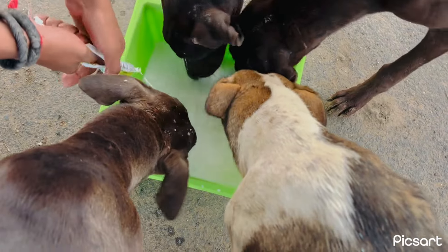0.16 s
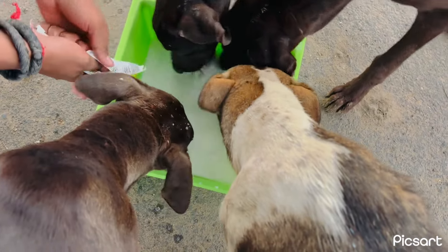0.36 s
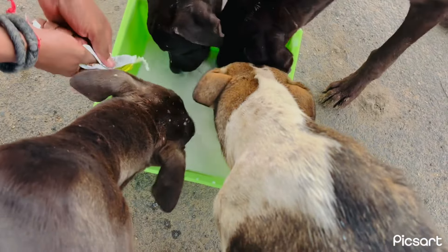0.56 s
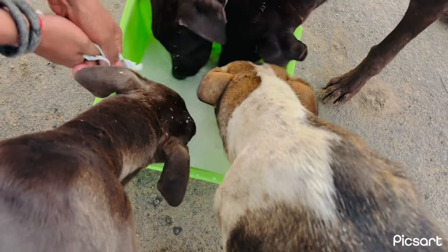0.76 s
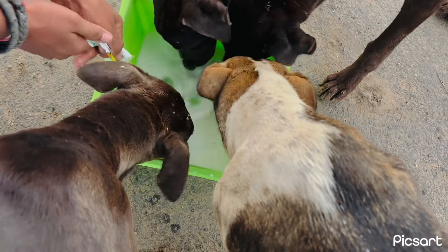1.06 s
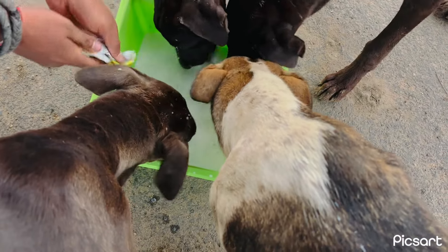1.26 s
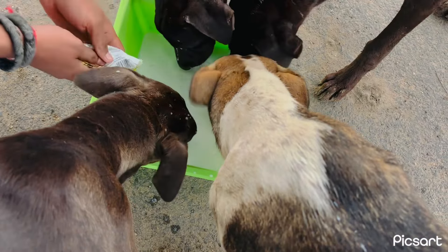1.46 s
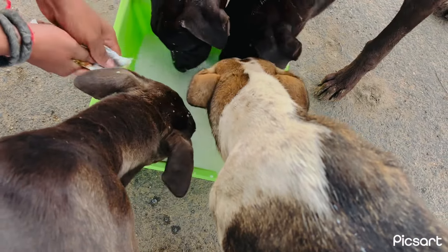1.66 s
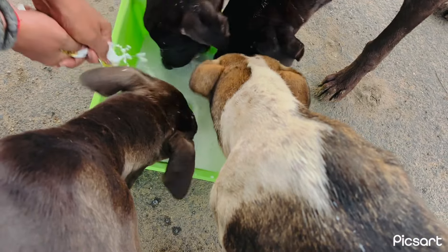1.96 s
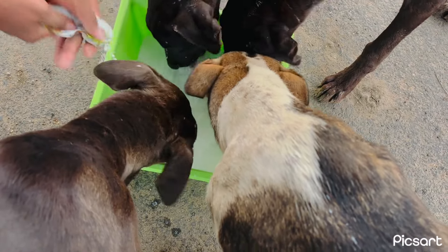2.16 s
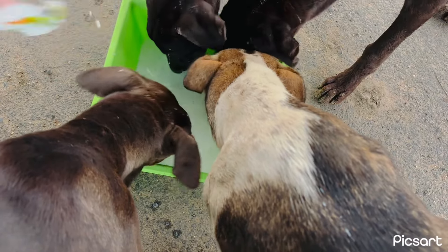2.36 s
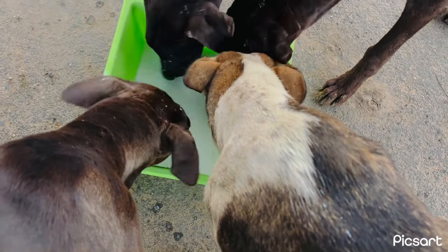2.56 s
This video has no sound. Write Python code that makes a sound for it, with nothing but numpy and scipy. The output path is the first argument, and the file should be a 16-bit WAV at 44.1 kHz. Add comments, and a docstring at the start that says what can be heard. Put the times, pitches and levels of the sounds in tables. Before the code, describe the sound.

Several dogs lapping liquid from a plastic tub outdoors, close and wet, with wind buffeting the microphone

```python
"""Wet laps, plops and smacks: several dogs drink from a plastic tub on open ground, close below the microphone.
Tongues slap the surface (bubble clusters), pop air pockets (short resonances) and snap wet films (noise bursts).
Froth ticks and fine spatter surround them, over bubbling, washing liquid; the tub's walls answer briefly.
Gusts of wind buffet the microphone with a noise rumble, a flutter of dull pulses and single thumps.
Behind lie a faint echo of the yard and the outdoor air, both shaped noise."""
import sys
import numpy as np
from scipy import signal
from scipy.fft import rfft, irfft, next_fast_len
from scipy.io import wavfile
from scipy.ndimage import uniform_filter1d, map_coordinates

SR = 44100
rng = np.random.default_rng(int(sys.argv[2]) if len(sys.argv) > 2 else 0)


def materialize(psi):
    """Save the field psi as 16-bit PCM at rate SR to the path in sys.argv[1].

    A 1-D psi becomes a single channel; in a 2-D psi each row is a channel.
    """
    bounded = np.clip(np.atleast_2d(psi).T, -1, 1)
    quanta = np.round(bounded * 32767).astype(np.int16)
    wavfile.write(sys.argv[1], SR, quanta)


N = 119070

# Levels are starting levels, before the trims, echoes, filters and port differences that follow.
# Colours give relative level over frequency.

# Air pockets popped by the tongues [t/s, f/Hz, level/dB, swell/ms]
PLOPS = [(0.085, 1240, -26.5, 1.7), (0.3244, 2110, -26, 1.4), (0.3329, 1253, -22, 1.6),
         (0.3792, 1380, -33, 0.91), (0.3935, 1170, -31, 1.5), (0.4197, 1430, -30, 0.85),
         (0.4386, 1280, -23, 0.79), (0.477, 1240, -29, 1.8), (0.616, 1290, -31, 1.5),
         (0.6272, 1570, -26, 1), (0.697, 1750, -34.5, 1.6), (.7280, 1230, -29, 0.62),
         (0.733, 2040, -37, 1.1), (0.759, 1100, -27.5, 1.5), (0.7795, 1220, -36.5, 1.2),
         (0.931, 1300, -30.5, 0.43), (0.9512, 2010, -32, 0.71), (0.9595, 1340, -35.5, 1.1),
         (1.0557, 1374, -34.5, 3.6), (1.073, 1300, -27, 1), (1.171, 1690, -40, 2.2),
         (1.1795, 1870, -39, 2.6), (1.2533, 1750, -32, 1), (1.264, 1730, -25.5, 0.59),
         (1.3108, 1240, -25, 0.41), (1.378, 1240, -24, 0.82), (1.383, 1520, -24, 0.73),
         (1.473, 1270, -25, 0.44), (1.557, 1440, -30.5, 0.45), (1.596, 1360, -27, 0.88),
         (1.685, 1220, -31.5, 0.49), (1.684, 2140, -37, 1.1), (1.7195, 1420, -29, 2.1),
         (1.718, 1820, -32.5, 1.8), (1.8087, 1270, -34.5, 0.92), (1.8105, 2160, -34, 1),
         (1.8961, 1295, -34.5, 1.35), (1.8976, 2460, -35, 0.7), (2.0297, 1360, -25.5, 0.42),
         (2.0392, 1130, -35, 0.72), (2.1515, 1440, -30.5, 0.79), (2.198, 1400, -36, 1.3),
         (2.231, 1340, -41.5, 1.5), (2.261, 2270, -37.5, 1.4), (2.298, 770, -33.5, 0.74),
         (2.2851, 2020, -31.5, 0.22), (2.3236, 1500, -29.5, 0.66), (2.341, 2370, -33.5, 0.72),
         (2.3969, 1410, -30, 1.5), (2.41, 1350, -32, 1.5), (2.4163, 1440, -22.5, 1.6),
         (2.461, 1250, -36.5, 1), (2.486, 785, -34.5, 1.1), (2.5858, 1940, -35.5, 1.9),
         (2.5872, 1174, -31.5, 1.2)]
PLOP_RISE = 0.0078  # relative pitch rise per swell time, for all bubbles but the fine grains
PLOP_SNAP_DB = -11.5
PLOP_OVERTONE_DB, PLOP_OVERTONE_RATIO = -16.5, 1.7  # second resonance
PLOP_SPLASH_DB, PLOP_SPLASH_S = -10, 0.0082
# Small bubbles that burst after each plop
DROPLET_DB, DROPLET_SPREAD_S, DROPLET_HZ, DROPLET_SWELL_CYCLES = -19, 0.013, 2510, 1.36

# Tongues slapping the surface [t/s, centre f/Hz, level/dB, life/ms]
SLAPS = [(0.216, 3370, -38, 4), (.3245, 2590, -23.5, 2.44), (0.334, 2300, -29.5, 5.9),
         (0.62, 1880, -37, 8.9), (.727, 2740, -34, 10), (0.95, 2620, -46, 5.7), (1.043, 2560, -36, 7),
         (1.180, 1930, -29, 6), (1.4722, 2960, -24, 1.5), (1.597, 2180, -33, 5.4),
         (1.92, 1450, -37.5, 10.3), (2.156, 2440, -38.5, 4.3), (2.3958, 2700, -28.5, 2.5),
         (2.414, 2060, -32, 5)]
SLAP_DB, SLAP_PITCH_SPREAD, SLAP_SWELL_CYCLES = -2.5, 0.19, 1.94  # spread is of log pitch

# Wet films snapping on lips and tongues [t/s, f/Hz, level/dB, swell/ms]
SMACKS = [(0.064, 5050, -32.5, 0.61), (.0850, 3370, -40.5, 0.81), (0.121, 5160, -45, 0.67),
          (0.3847, 9850, -40.5, 1.2), (.4385, 3360, -38.5, 0.65), (0.464, 9000, -43, 1.44),
          (0.4686, 4900, -43, 1.6), (.5023, 4840, -35.5, 0.27), (0.6243, 3850, -42, 2.2),
          (.7594, 2990, -38.5, 1.3), (.9397, 5000, -34, 0.34), (0.9545, 3700, -39, 0.59),
          (0.978, 4100, -47, 2.2), (1.1713, 4610, -43.5, 1.9), (1.2386, 8340, -40.5, 1.5),
          (1.239, 5030, -39, 0.65), (1.2523, 4950, -37, 0.93), (1.383, 5800, -40, 0.87),
          (1.4058, 4900, -35.5, 0.48), (1.4204, 3540, -34, 0.68), (1.4729, 4300, -24, 0.17),
          (1.557, 4670, -41, 0.81), (1.598, 3950, -44.5, 1.9), (1.6462, 3960, -38, 0.53),
          (1.7130, 5100, -27, 0.13), (1.9118, 6040, -30, 0.14), (2.0327, 5050, -31.5, 1.05),
          (2.2118, 10500, -32.5, 0.3), (2.2857, 5330, -33.5, 0.21), (2.339, 4065, -36, 2),
          (2.3965, 3470, -41, 0.56), (2.5833, 4030, -36, 1.5), (2.6718, 3440, -37.5, 0.54)]
SMACK_SNAP_DB, SMACK_RISE = -4, 0.01  # rise is relative, per swell time

# Needle-sharp clicks of bursting froth [t/s, level/dB]
TICKS = [(0.3017, -33.5), (0.385, -33), (0.4678, -27), (0.5026, -27), (0.554, -33.5), (0.677, -42),
         (0.741, -26), (0.9768, -31), (1.239, -31), (1.302, -31), (1.366, -26.5), (1.4646, -32),
         (1.5532, -34), (1.599, -29), (1.7105, -27), (1.811, -41), (1.911, -33), (1.97, -35),
         (2.0333, -26.5), (2.152, -32.5), (2.2126, -34), (2.398, -31)]
TICK_DB, TICK_LIFE_S = 3.5, 0.0002

# Course of the fine spatter [t/s, level/dB]
SPATTER_COURSE = [(0.0, -42.5), (0.03, -53.5), (0.06, -45.5), (0.14, -44), (0.17, -55.5), (0.23, -49.5),
                  (0.31, -53.5), (0.33, -50), (0.35, -49.5), (0.48, -47.5), (0.59, -51.5), (0.62, -45),
                  (0.65, -46.5), (0.74, -45.5), (0.89, -50.5), (0.95, -41), (1.15, -58), (1.17, -45.5),
                  (1.22, -50), (1.24, -40.5), (1.36, -50), (1.42, -46), (1.44, -76), (1.47, -53),
                  (1.49, -48), (1.54, -59), (1.6, -38.5), (1.62, -51), (1.71, -43.5), (1.71, -45),
                  (1.74, -55.5), (1.97, -45.5), (2.02, -51), (2.04, -66), (2.05, -52.5), (2.41, -50),
                  (2.53, -52), (2.59, -43), (2.61, -58.5), (2.7, -47)]
# Colour of the fine spatter [f/Hz, level/dB]
SPATTER_COLOUR = [(900, -30), (2000, -10), (3200, 6), (5000, 3), (6500, 4.5), (9000, 4), (12000, -1),
                  (15500, -6)]
DROPS_DB, FROTH_DB, FIZZ_DB = -7, -7, -14.5

# Course of the stirred liquid [t/s, level/dB]
SLOSH_COURSE = [(0.0, -44.5), (0.24, -56), (0.41, -53), (0.56, -55.5), (0.71, -46), (0.88, -58),
                (0.99, -43.5), (1.11, -60.5), (1.16, -46), (1.51, -56), (1.85, -52.5), (1.99, -53.5),
                (2.23, -56), (2.37, -54), (2.59, -48.5), (2.63, -58), (2.7, -51)]
# Colour of the liquid's wash [f/Hz, level/dB]
WASH_COLOUR = [(400, -10), (800, -1), (1300, 5.5), (2000, 1), (3000, -10.5), (5000, -16.5)]
BUBBLES_DB, WASH_DB = 0.5, -3

# Course of the deep wind rumble on the microphone [t/s, level/dB]
RUMBLE_COURSE = [(0.0, -32), (0.11, -42.5), (0.17, -32), (0.38, -25), (0.43, -33.5), (0.54, -18.5),
                 (0.69, -28), (0.89, -21.5), (0.93, -28.5), (1.12, -17), (1.22, -29.5), (1.32, -17),
                 (1.46, -24.5), (1.48, -19), (1.72, -27.5), (1.74, -18.5), (2.23, -30), (2.26, -22.5),
                 (2.32, -37.5), (2.35, -25.5), (2.53, -38), (2.7, -32.5)]
# Colour of the rumble [f/Hz, level/dB]
RUMBLE_COLOUR = [(20, -31), (28, -30), (38, -10.5), (50, -5.5), (75, -1.5), (110, -6.5), (170, -10.5),
                 (260, -16.5), (500, -37), (1000, -96)]
# Course of the wind flutter above the rumble [t/s, level/dB]
FLUTTER_COURSE = [(0.0, -46), (0.15, -55.5), (0.19, -35.5), (0.33, -36.5), (0.34, -28), (0.42, -37.5),
                  (0.555, -23.5), (0.6, -37.5), (0.65, -25.5), (0.72, -42.5), (0.77, -26), (1.0, -33),
                  (1.01, -24.5), (1.11, -20.5), (1.22, -46.5), (1.25, -26.5), (1.73, -26), (1.74, -19),
                  (1.81, -28), (1.83, -21), (1.92, -43), (1.94, -24), (2.15, -41), (2.185, -24),
                  (2.21, -43), (2.43, -37.5), (2.47, -45.5), (2.62, -50), (2.65, -39), (2.7, -55)]
# Colour of the flutter [f/Hz, level/dB]
FLUTTER_COLOUR = [(80, -60), (170, -4), (260, 0.5), (400, -1.5), (550, -7.5), (750, -15), (1000, -25.5),
                  (1600, -58), (3000, -87)]
FLUTTER_DB = -0.5
# Dull thumps of the strongest eddies on the microphone [t/s, f/Hz, level/dB, Gaussian width/ms]
EDDIES = [(.348, 326, -14.5, 2), (.486, 195, -15, 3), (.535, 171, -7.5, 2.6), (.551, 346, -10.5, 1.97),
          (.779, 422, -14.5, 1.6), (.822, 460, -24, 1.1), (.853, 560, -20.5, 1.3), (.862, 430, -18, 2.4),
          (.884, 69, -13.5, 11.4), (0.937, 436, -18, 1.3), (1.023, 345, -11.5, 1.3),
          (1.04, 403, -13.5, 0.65), (1.056, 564, -17, 0.34), (1.087, 415, -13, 2.6),
          (1.101, 540, -11.5, 1.4), (1.111, 222, -11, 1.55), (1.128, 380, -11.5, 0.7), (1.143, 500, -22, 3),
          (1.158, 490, -18.5, 0.65), (1.28, 315, -16, 1.8), (1.306, 500, -14, 0.6), (1.327, 99, -8, 6.1),
          (1.333, 450, -16, 0.74), (1.37, 400, -15, 0.71), (1.394, 450, -17.5, 1.5), (1.407, 257, -14, 1.6),
          (1.487, 111, -11, 7.1), (1.506, 380, -17.5, 1.8), (1.553, 460, -10, 1.5),
          (1.574, 634, -16.5, 0.74), (1.583, 410, -16, 1.2), (1.634, 320, -15, 2), (1.737, 500, -15, 1.3),
          (1.749, 403, -13, 0.71), (1.776, 416, -13, 1.04), (1.829, 427, -10.5, 1.66),
          (1.896, 406, -15, 0.66), (1.958, 335, -18.5, 1.2), (1.971, 318, -17, 2.1),
          (2.174, 300, -16, 0.79), (2.183, 280, -24, 1.3), (2.189, 518, -14.5, 1.16),
          (2.369, 466, -23.5, 1.6)]
EDDY_DB = -0.5
# Wind at the two microphone ports [f/Hz, left minus right level/dB]
WIND_BALANCE = [(200, 0.5), (380, 0), (600, 3), (1000, 5.5)]
WIND_LOW_CUT_HZ = 30  # half gain here

# Colour of the background noise, with a deep gap near 12 kHz [f/Hz, level/dB]
AIR_COLOUR = [(100, 5), (300, -13), (640, -18.5), (1340, -22.5), (3000, -33), (6600, -28), (9500, -31),
              (12000, -63), (15500, -55)]
AIR_DB = -47.5

# Echo decay times and levels of the tub's walls and of the yard
TUB_T60_S, TUB_DB, YARD_T60_S, YARD_DB = 0.025, -2, 0.23, -15.5

# Phase at the two microphone ports [f/Hz, left lead/rad]
PORT_PHASE = [(100, 0), (950, -.5), (2900, .8), (3700, .1), (5500, -.2), (6900, -3.1), (7750, -5.8),
              (9700, -6.5), (11200, -8.8), (13000, -9.9), (14200, -12.4), (16000, -12.6)]
# Balance of the two microphone ports [f/Hz, left minus right level/dB]
PORT_BALANCE = [(200, -5), (700, 16.5), (1290, 7), (2380, 4.5), (4400, 2), (8120, 0.8), (15000, -1)]
TOP_HZ = 16300  # recorder's band limit


def plops():
    """Each popped pocket gives a snap, two short resonances, a little splash and a cluster of droplets."""
    track, t = np.zeros((2, N)), np.arange(1400) / SR
    for s, hz, db, swell_ms in PLOPS:
        swell_s = swell_ms / 1000
        ring = pocket(t, hz, swell_s, PLOP_RISE)
        upper_hz = hz * PLOP_OVERTONE_RATIO * np.exp(rng.normal(0, 0.174))
        upper = amp(PLOP_OVERTONE_DB) * pocket(t, upper_hz, 0.56 * swell_s, PLOP_RISE)
        crack = amp(PLOP_SNAP_DB) * snap(t, life_s=0.00033, lo_hz=1200, hi_hz=7650)
        splash = amp(PLOP_SPLASH_DB) * snap(t, life_s=PLOP_SPLASH_S, lo_hz=0.65 * hz, hi_hz=1.29 * hz)
        add(track, s, amp(db) * in_tub(ring + upper + crack + splash))
        add(track, s, amp(db + DROPLET_DB) * in_tub(droplets(t, count=5)))
    return track


def droplets(t, count):
    """Small bubbles of random pitch and size burst at random short delays."""
    r = rng.standard_normal((count, 3))
    hz = DROPLET_HZ * np.exp(0.49 * r[:, :1])
    delay = DROPLET_SPREAD_S * np.abs(r[:, 1:2])
    age = np.maximum(t - delay, 0)
    size = amp(3.1 * np.minimum(r[:, 2:], 1))
    return (size * pocket(age, hz, DROPLET_SWELL_CYCLES / hz, PLOP_RISE)).sum(0)


def slaps():
    """A tongue hits the liquid and traps a tight cluster of bubbles, the later ones weaker."""
    track, t = np.zeros((2, N)), np.arange(1800) / SR
    for s, hz, db, life_ms in SLAPS:
        add(track, s, amp(db + SLAP_DB) * in_tub(cluster(t, hz, life_ms / 1000, count=12)))
    return track


def cluster(t, hz, life_s, count):
    """Bubbles of either polarity overlap around one pitch; energy is scaled to the cluster's life."""
    r = rng.standard_normal((count, 2))
    late = np.linspace(0, 1, count)[:, None] ** 2 * 2.9  # delay in lives, crowded towards the start
    pitch = hz * np.exp(SLAP_PITCH_SPREAD * r[:, :1])
    age = np.maximum(t - late * life_s, 0)
    size = np.sign(r[:, 1:]) * np.exp(-late / 2)
    burst = (size * pocket(age, pitch, SLAP_SWELL_CYCLES / pitch, PLOP_RISE)).sum(0)
    return to_life(burst, life_s)


def smacks():
    """Wet films snap with a high, very short chirp and a burst of noise."""
    track, t = np.zeros((2, N)), np.arange(1000) / SR
    for s, hz, db, swell_ms in SMACKS:
        swell_s = swell_ms / 1000
        chirp = pocket(t, hz, swell_s, SMACK_RISE)
        crack = amp(SMACK_SNAP_DB) * snap(t, life_s=2.9 * swell_s, lo_hz=2240, hi_hz=9350)
        add(track, s, amp(db) * in_tub(chirp + crack))
    return track


def ticks():
    """Froth bursts in needle-sharp clicks of high noise."""
    track, t = np.zeros((2, N)), np.arange(400) / SR
    for s, db in TICKS:
        add(track, s, amp(db + TICK_DB) * in_tub(snap(t, life_s=TICK_LIFE_S, lo_hz=7000, hi_hz=15800)))
    return track


def spatter():
    """Droplets and froth crackle over the low bubbling and wash of the stirred liquid."""
    drops = coloured(grains(count=1500, pitch_hz=5525, spread=0.95, cycles=2.2, scatter_db=4.0), SPATTER_COLOUR)
    drops = steadied(in_tub(drops)[:, :N], span_s=0.18)
    crackle = coloured(froth(count=2000, scatter_db=10), SPATTER_COLOUR)
    crackle = steadied(in_tub(crackle)[:, :N], span_s=0.13)
    fizz = coloured(rng.standard_normal(N), SPATTER_COLOUR)
    fine = amp(DROPS_DB) * drops + amp(FROTH_DB) * crackle + amp(FIZZ_DB) * fizz

    bubbles = grains(count=1100, pitch_hz=1602, spread=0.606, cycles=1.8, scatter_db=7.5)
    bubbles = steadied(in_tub(bubbles)[:, :N], span_s=0.158)
    wash = coloured(rng.standard_normal(N), WASH_COLOUR)
    stirred = amp(BUBBLES_DB) * bubbles + amp(WASH_DB) * wash
    return level(SPATTER_COURSE) * fine + level(SLOSH_COURSE) * stirred


def grains(count, pitch_hz, spread, cycles, scatter_db):
    """Tiny bubbles sound at random times, with random pitch and size."""
    r, t = rng.random((count, 3)), np.arange(600) / SR
    hz = np.clip(pitch_hz * np.exp(spread * (2 * r[:, 1:2] - 1)), 200, 16000)
    size = amp(-scatter_db * np.log(1 - .97 * r[:, 2:]))
    waves = size * pocket(t, hz, cycles / hz, rise=0.018)
    index = (r[:, :1] * N).astype(int) + np.arange(len(t))
    return np.bincount(index.ravel(), waves.ravel(), N)[:N]


def froth(count, scatter_db):
    """Single-sample clicks fall at random times, with uneven size and either polarity."""
    r = rng.random((count, 3))
    size = amp(-scatter_db * np.log(1 - .98 * r[:, 1])) * np.sign(r[:, 2] - .5)
    return np.bincount((r[:, 0] * N).astype(int), size, N)


def pocket(t, hz, swell_s, rise):
    """A small air pocket swells and dies, rising in pitch over its first eight swell times."""
    u = t / swell_s
    envelope = u * np.exp(1 - u)
    return envelope * np.sin(2 * np.pi * hz * t * (1 + rise * np.minimum(u, 8) / 2))


def snap(t, life_s, lo_hz, hi_hz):
    """A tearing wet film gives a spiky burst of band-limited noise."""
    burst = rng.standard_normal(len(t)) * np.exp(-t / life_s) * (1 - np.exp(-t / (0.28 * life_s)))
    band = [lo_hz, min(hi_hz, .45 * SR)]
    burst = signal.sosfilt(signal.butter(2, band, 'bandpass', fs=SR, output='sos'), burst)
    return to_life(burst, life_s)


def to_life(burst, life_s):
    """Scale a burst so that its rms, reckoned over one life, is a half."""
    return burst / np.sqrt(np.sum(burst ** 2) / (life_s * SR)) / 2


def in_tub(sound):
    """The tub's walls add a brief stereo answer, partly shared by both microphone ports."""
    h = tail(TUB_T60_S, length_s=0.032)
    shared, opposed = 0.8 * h[0], 0.52 * np.array([[1], [-1]]) * h[1]
    h = amp(TUB_DB) * (shared + opposed)
    h[:, 0] += 1  # direct sound
    return signal.fftconvolve(h, sound[None], axes=1)


def wind():
    """Gusts rumble and flutter on the microphone, and single eddies thump it."""
    rumble = level(RUMBLE_COURSE) * buffet(RUMBLE_COLOUR, side_db=-13.0, lumpy_db=1.5, lumps_per_s=31)
    flutter = amp(FLUTTER_DB) * level(FLUTTER_COURSE) * patter(count=2000, side_db=-3.5)

    def response(hz):
        low_cut = hz ** 4 / (hz ** 4 + WIND_LOW_CUT_HZ ** 4)
        return low_cut * amp(np.array([[.5], [-.5]]) * along(WIND_BALANCE, hz))
    return filtered(rumble + flutter + eddy_thumps(), response)


def buffet(colour, side_db, lumpy_db, lumps_per_s):
    """Turbulent pressure comes as noise in quick lumps, nearly the same at both ports."""
    knots = rng.standard_normal(2000)
    lumps = amp(lumpy_db * map_coordinates(knots, [np.arange(N) * lumps_per_s / SR], mode='wrap'))
    mid, side = rng.standard_normal((2, N)) * lumps
    side = amp(side_db) * side
    return steadied(coloured(np.array([mid + side, mid - side]), colour), span_s=0.0418)


def patter(count, side_db):
    """Closely packed dull pressure pulses reach both ports, with opposed noise between them."""
    mid = froth(count=count, scatter_db=2.5)
    side = amp(side_db) * rng.standard_normal(N) * np.sqrt(count / N)
    return steadied(coloured(np.array([mid + side, mid - side]), FLUTTER_COLOUR), span_s=0.045)


def eddy_thumps():
    """Each strong eddy presses the microphone with a Gaussian-shaped tone of random phase."""
    thumps, t = np.zeros(N), np.arange(-2000, 2000) / SR
    for s, hz, db, width_ms in EDDIES:
        envelope = np.exp(-(t * 1000 / width_ms) ** 2 / 2)
        tone = np.cos(2 * np.pi * (hz * t + rng.random()))
        add(thumps, s + t[0], amp(db + EDDY_DB) * envelope * tone)
    return thumps


def yard_echo(sound):
    """The yard returns a faint, decaying noise-like echo."""
    return amp(YARD_DB) * signal.fftconvolve(sound, tail(YARD_T60_S, length_s=0.24), axes=1)[:, :N]


def outdoor_air():
    """The outdoor background is steady coloured noise, partly shared by both ports."""
    noise = rng.standard_normal(N) + 2.1 * rng.standard_normal((2, N))
    return amp(AIR_DB) * coloured(noise, AIR_COLOUR)


def at_ports(x):
    """Sound reaches the two microphone ports with different level and phase."""
    half = np.array([[.5], [-.5]])

    def response(hz):
        return amp(half * along(PORT_BALANCE, hz)) * np.exp(1j * half * along(PORT_PHASE, hz))
    return filtered(x, response)


def tail(t60_s, length_s):
    """A fresh stereo echo tail of decaying noise, with unit energy in its first channel."""
    t = np.arange(int(length_s * SR)) / SR
    h = rng.standard_normal((2, len(t))) * amp(-60 * t / t60_s) * (1 - np.exp(-t / 0.00065))
    return h / np.linalg.norm(h[0])


def amp(db):
    """Decibels to gain."""
    return 10 ** (np.asarray(db) / 20)


def unit(x):
    """Scale to rms 1."""
    return x / np.sqrt(np.mean(x ** 2) + 1e-20)


def along(points, hz):
    """Interpolate [f/Hz, value] points on a log frequency axis."""
    f, v = np.transpose(points)
    return np.interp(np.log(hz + 1), np.log(f + 1), v)


def level(rows):
    """Turn [t/s, level/dB] points into one gain per sample."""
    s, db = np.transpose(rows)
    return amp(np.interp(np.arange(N) / SR, s, db))


def filtered(x, response):
    """Multiply the spectrum of x by a complex response of frequency."""
    m = next_fast_len(N + SR // 4)
    return irfft(rfft(x, m) * response(np.fft.rfftfreq(m, 1 / SR)), m)[..., :N]


def coloured(x, colour):
    """Give x a [f/Hz, level/dB] colour, at rms 1."""
    return unit(filtered(x, lambda hz: amp(along(colour, hz))))


def steadied(x, span_s):
    """Divide out the slow swells of x, at rms 1."""
    power = uniform_filter1d(np.atleast_2d(x ** 2).mean(0), max(int(span_s * SR), 8))
    return unit(x / np.sqrt(np.abs(power) + 0.01 * power.mean()))


def add(track, s, sound):
    """Mix a sound into a track at a time in seconds."""
    start = int(np.clip(round(s * SR), 0, N - 1))
    track[..., start:start + sound.shape[-1]] += sound[..., :N - start]


def scene():
    """The dogs drink close below the microphone, with yard echo and air behind and wind on the ports."""
    drinking = plops() + slaps() + smacks() + ticks() + spatter()
    return at_ports(drinking + yard_echo(drinking) + outdoor_air()) + wind()


def record(dry):
    """The recorder keeps nothing above its band limit."""
    return filtered(dry, lambda hz: hz < TOP_HZ)


dry = scene()
out = record(dry)
materialize(out)
```